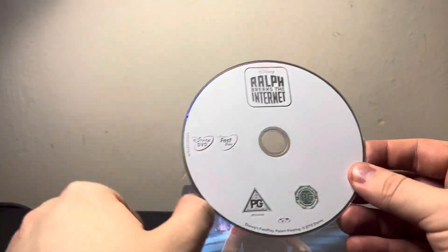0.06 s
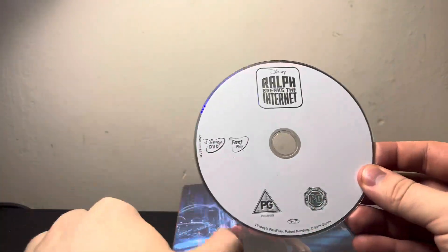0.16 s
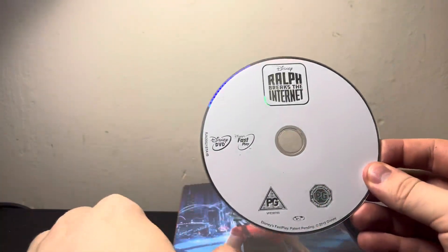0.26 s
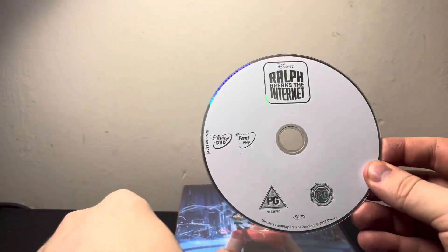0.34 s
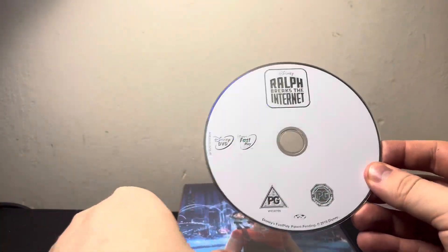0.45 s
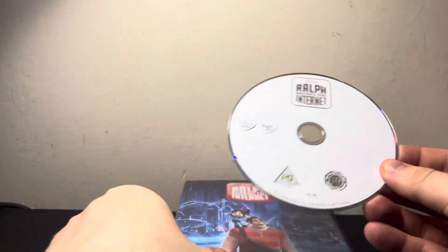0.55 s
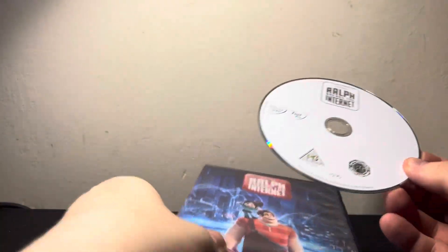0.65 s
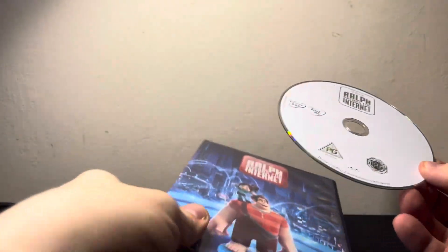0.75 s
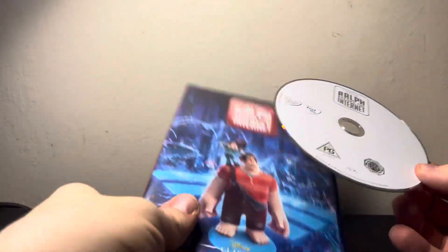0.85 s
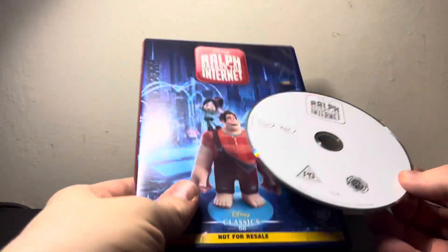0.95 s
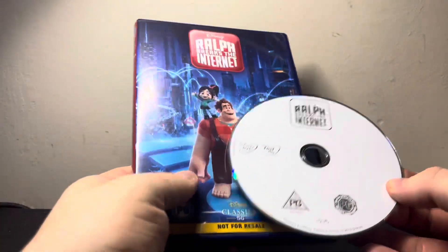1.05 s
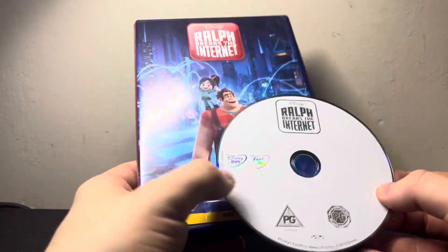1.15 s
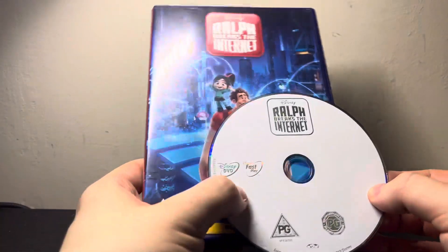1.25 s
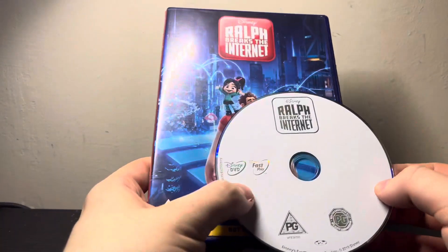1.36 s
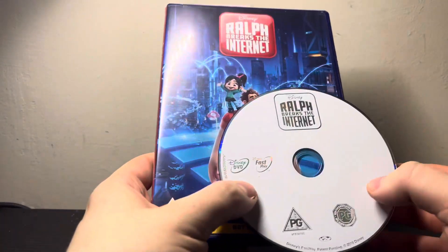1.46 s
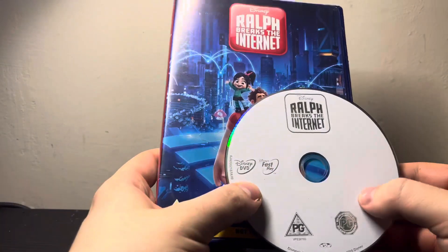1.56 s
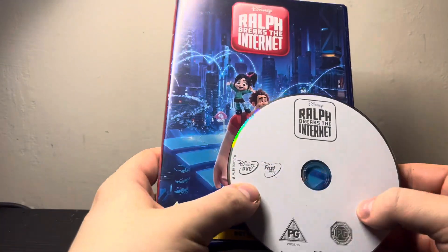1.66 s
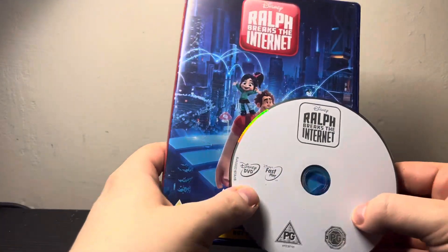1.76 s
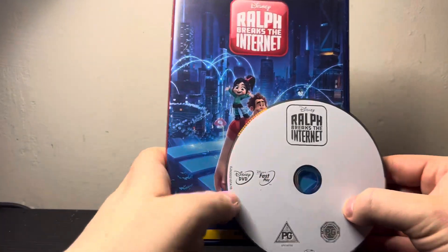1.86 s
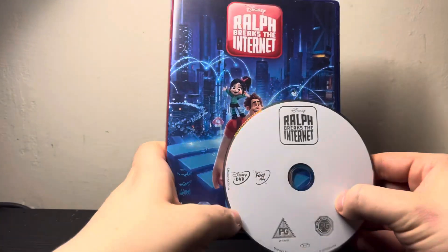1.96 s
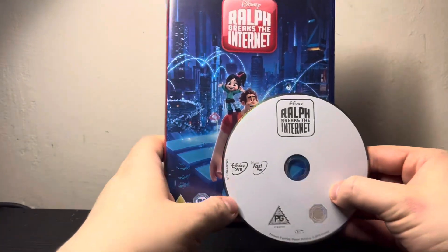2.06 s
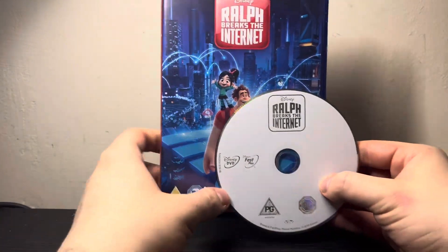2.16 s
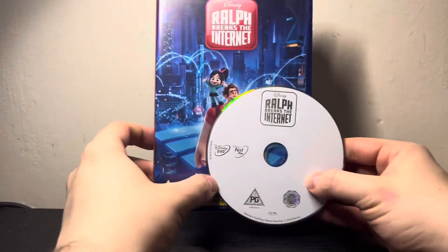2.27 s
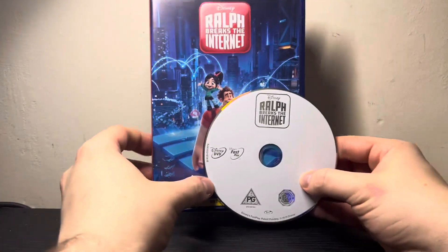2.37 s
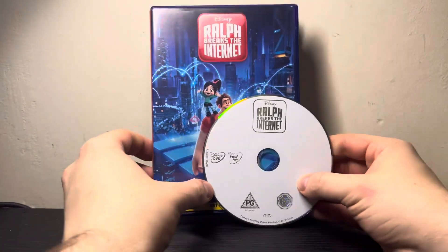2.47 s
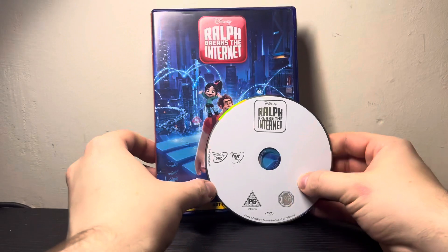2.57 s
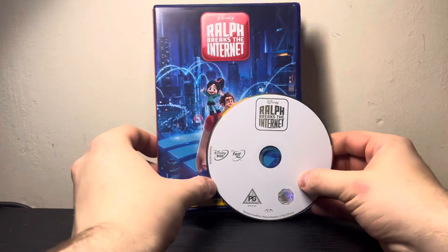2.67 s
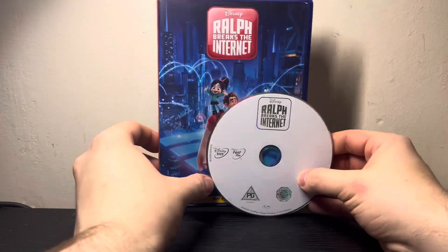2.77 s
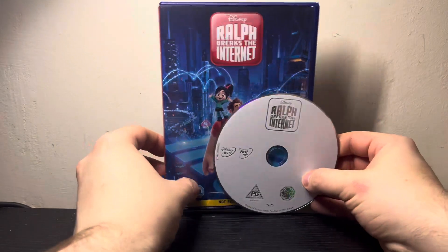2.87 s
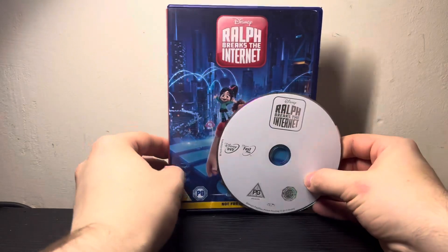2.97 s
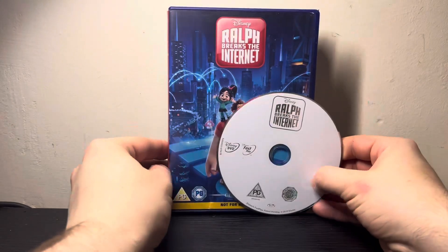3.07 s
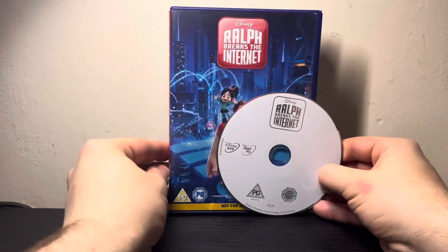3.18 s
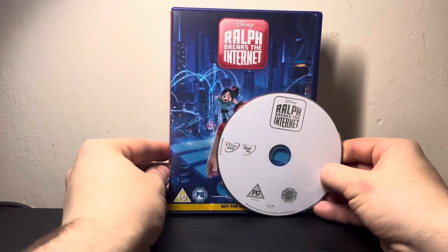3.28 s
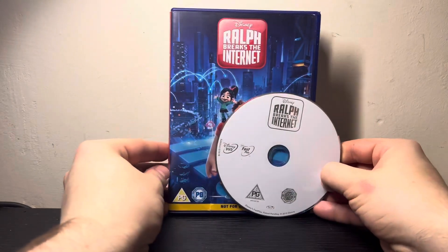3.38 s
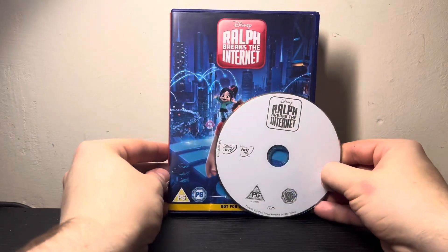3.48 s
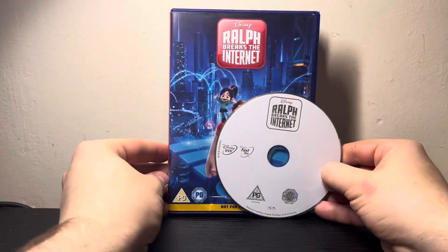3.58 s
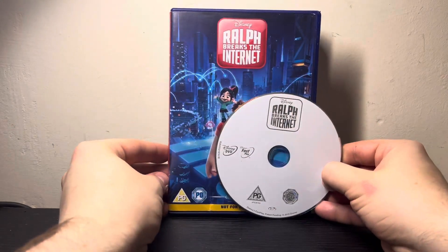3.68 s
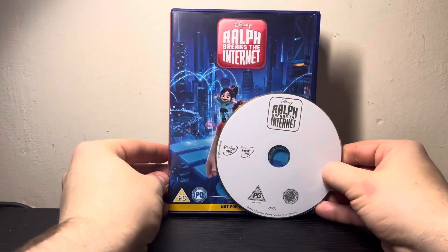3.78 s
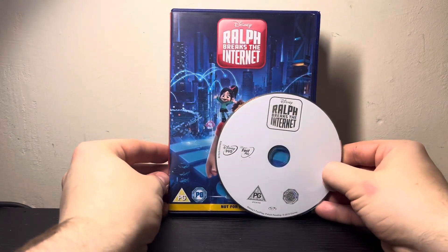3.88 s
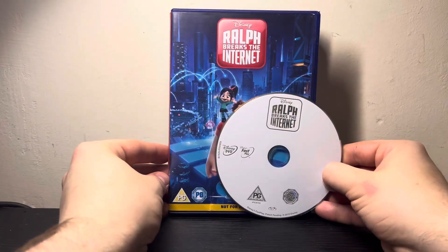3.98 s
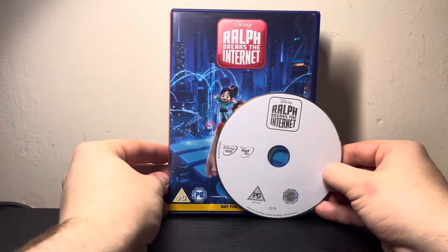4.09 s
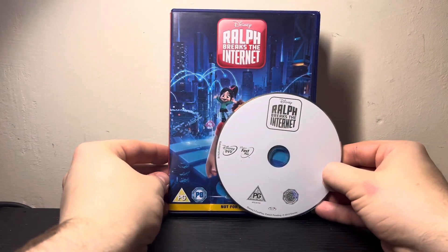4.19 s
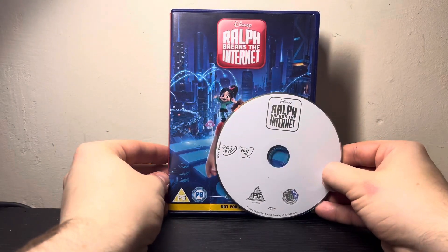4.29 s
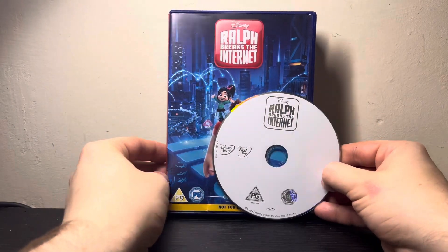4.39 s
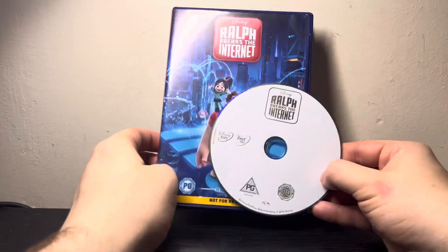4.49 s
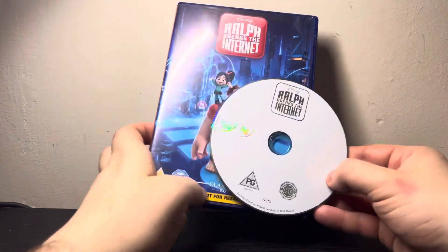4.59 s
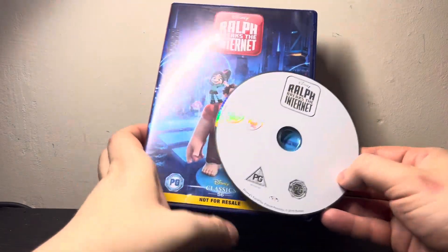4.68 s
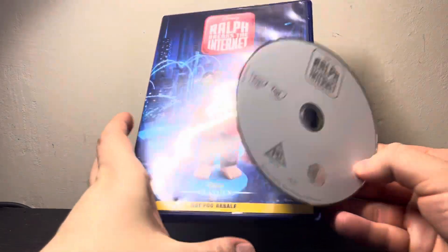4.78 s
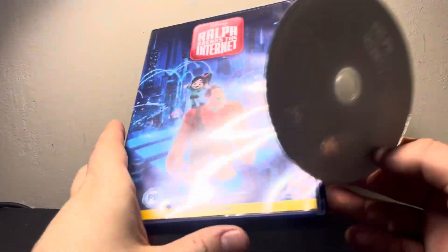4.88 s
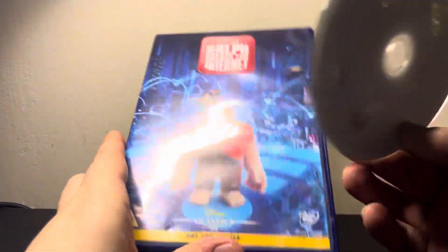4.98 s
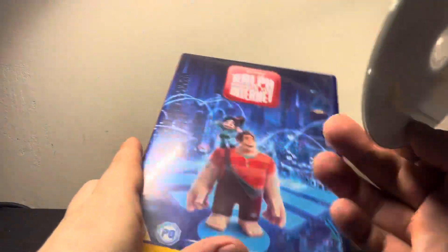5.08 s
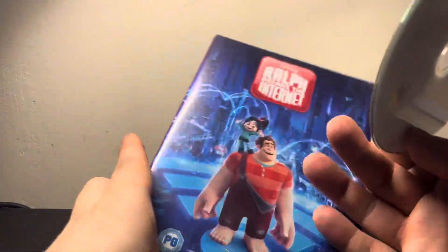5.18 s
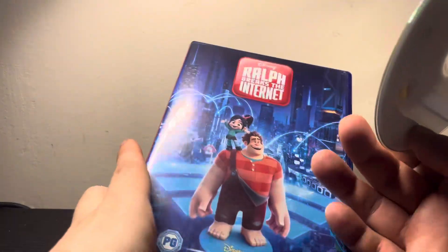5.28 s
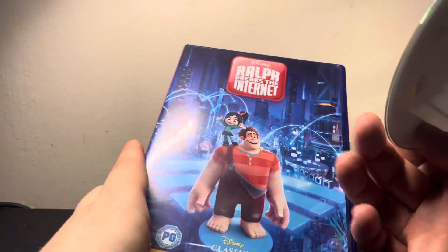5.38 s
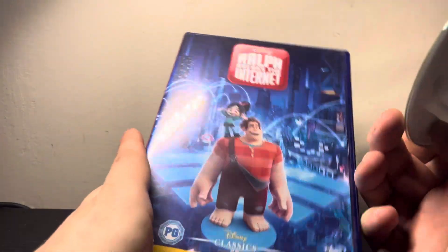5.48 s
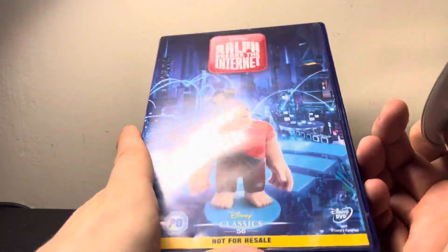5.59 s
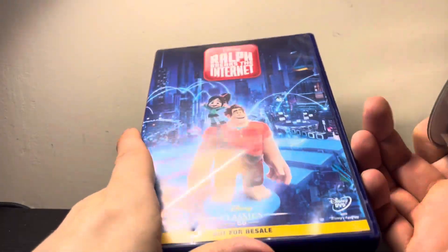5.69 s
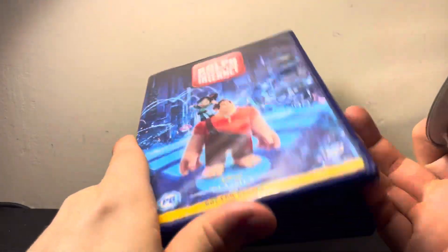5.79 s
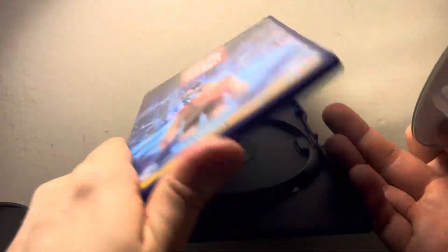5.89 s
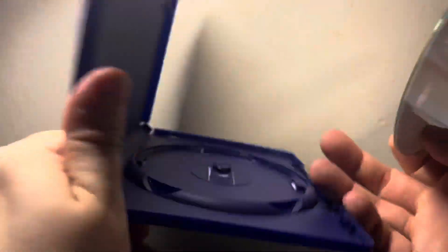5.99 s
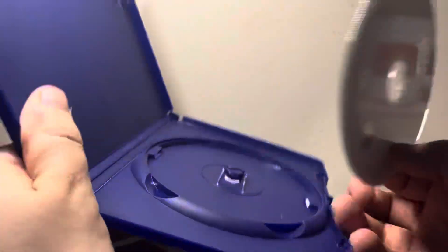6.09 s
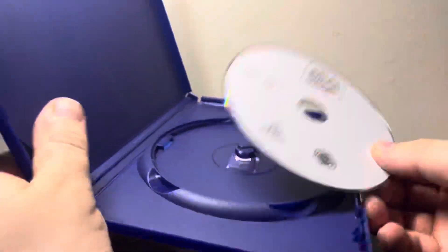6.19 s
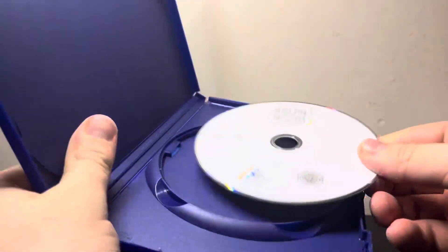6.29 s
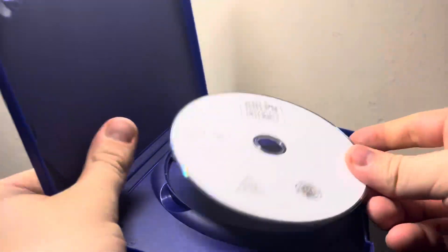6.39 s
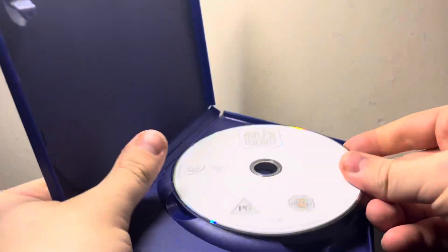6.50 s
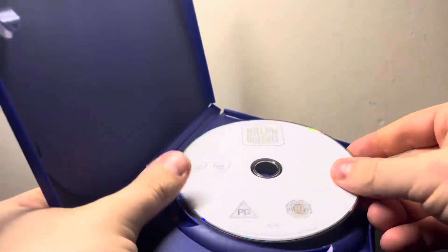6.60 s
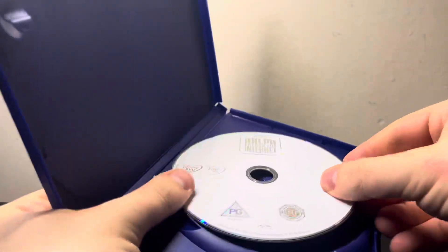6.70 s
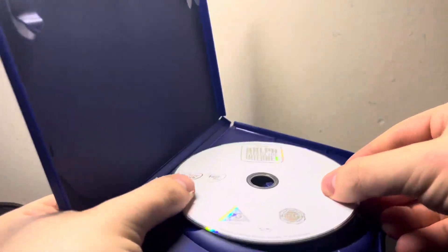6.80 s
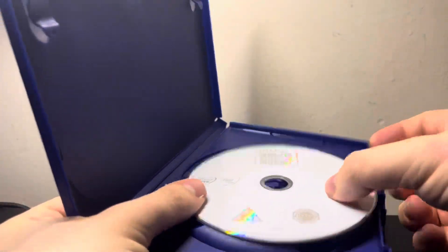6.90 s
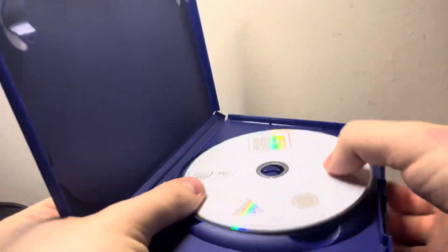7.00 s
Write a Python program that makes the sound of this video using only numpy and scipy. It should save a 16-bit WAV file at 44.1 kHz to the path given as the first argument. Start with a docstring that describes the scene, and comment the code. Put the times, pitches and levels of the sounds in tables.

```python
"""Disc and plastic case on a table

Hands handle a disc and its plastic case close to the microphones in a small room, with a faint fan.
The case scrapes as it is tipped up, its edge judders over the table, and skin slides over the sleeve.
It snaps open, the lid falls back, and the disc is laid in and clicked onto the hub.
Rubs are noise grains or stick-slip pulses through resonances; contacts are noise bursts with decaying rings."""
import sys
import numpy as np
from scipy import signal
from scipy.fft import rfft, irfft, next_fast_len
from scipy.io import wavfile
from scipy.ndimage import uniform_filter1d, map_coordinates

SR = 44100
rng = np.random.default_rng(int(sys.argv[2]) if len(sys.argv) > 2 else 0)


def to_wav(sig):
    """Store sig (one row per channel, or 1-D mono) as 16-bit WAV at the path in sys.argv[1].

    Samples outside -1..1 are clipped; the rate is SR.
    """
    pcm = np.clip(np.atleast_2d(sig), -1, 1) * 32767
    pcm = np.round(pcm).astype(np.int16)
    wavfile.write(sys.argv[1], SR, pcm.T)  # frames by channels


N = 310905
TIME = np.arange(N) / SR

# Resonances of the case. Each row: frequency in Hz, width in Hz, relative level in dB.
CASE_RESONANCES = [(952, 39, 4.5), (1283, 48, 8), (1670, 42, 0), (2083, 36, 1.5), (2351, 25, 1),
                   (3583, 140, 4.5), (4134, 120, -21), (5740, 160, -4)]
# Low resonances of the case pressed on the table. Each row: frequency in Hz, width in Hz, relative level in dB.
GROAN_RESONANCES = [(109, 77, -5.5), (233.7, 29, -2), (440, 64.6, 1.5), (520.5, 29, 2)]
# Middle resonances of the case on the table. Each row: frequency in Hz, width in Hz, relative level in dB.
JUDDER_RESONANCES = [(825, 70, -4), (909, 38, -1), (950, 63, -6.5)]
# Spectrum of a plastic scrape. Each row: frequency in Hz, relative level in dB.
SCRAPE_SPECTRUM = [(82, -44.5), (140, -21), (540, -11.5), (880, -9.5), (1410, -12), (2430, -12),
                   (3600, -14.5), (5300, -16), (8020, -34.5), (12300, -33), (14800, -52.5)]
# Registers of a contact: clack, hollow body, snap, tick. Each row: low edge in Hz, high edge in Hz.
CONTACT_REGISTERS = [(600, 2000), (230, 600), (2000, 6000), (6000, 15000)]


def from_db(db):
    """Decibels to gain."""
    return 10 ** (np.asarray(db) / 20)


def rms_one(x):
    """Scale to rms 1."""
    return x / np.sqrt(np.mean(x ** 2) + 1e-20)


def evened(x, span_s=0.074):
    """Hold the level steady over a short span, keeping quicker pulses."""
    power = uniform_filter1d(np.mean(x ** 2, axis=0), max(8, int(span_s * SR)))
    return x / np.sqrt(power + 1e-12)


def dying(t, t60):
    """Exponential decay, 60 dB down after t60 seconds."""
    return np.exp(-np.log(1000) * t / np.maximum(t60, 1e-3))


def at_hz(points, hz):
    """Read a (Hz, value) table on a log-frequency axis."""
    known_hz, values = np.transpose(points)
    return np.interp(np.log(np.maximum(hz, 1)), np.log(known_hz), values)


def stroke_gain(curve):
    """Gain over time from an (s, dB) curve, slightly smoothed; silent outside it."""
    s, db = np.transpose(curve)
    gain = from_db(np.interp(TIME, s, db, -200, -200))
    return uniform_filter1d(gain, SR // 300).clip(0)


def swell(top_s, half_s, shape=2.34):
    """Pressure of a short stroke: rises to its top and lets go, at 1/e after half_s."""
    gain = np.zeros(N)
    near = np.abs(TIME - top_s) < 6 * half_s
    gain[near] = np.exp(-np.abs((TIME[near] - top_s) / half_s) ** shape)
    return gain


def add(track, s, sound):
    """Mix a stereo sound into the track at time s."""
    start = max(0, round(s * SR))
    track[:, start:start + sound.shape[1]] += sound[:, :N - start]


def band(x, low, high, order=3):
    """Causal band-pass."""
    sos = signal.butter(order, [low, min(high, .45 * SR)], "band", fs=SR, output="sos")
    return signal.sosfilt(sos, x + 1e-18)


def coloured(x, spectrum):
    """Filter with a smooth (Hz, dB) spectrum."""
    count = x.shape[-1]
    size = next_fast_len(count + 2048)
    gain = from_db(at_hz(spectrum, np.fft.rfftfreq(size, 1 / SR)))
    return irfft(rfft(x, size) * gain, size)[..., :count]


def resonate(x, modes):
    """Parallel resonances of (Hz, width in Hz, dB), signs alternating."""
    total = 0
    for k, (hz, width, db) in enumerate(modes):
        ring = signal.lfilter(*signal.iirpeak(hz, hz / width, SR), x + 1e-18)
        total = total + (-1) ** k * from_db(db) * ring
    return total


def drift(rate):
    """Smooth random curve about 0 through normal draws, rate per second (at most 500)."""
    knots = rng.standard_normal(4000)
    coarse = TIME[::16]
    return np.interp(TIME, coarse, map_coordinates(knots, [coarse * min(rate, 500)], order=2))


def two_mics(count):
    """Noise at two microphones: alike in the bass and top treble, largely unrelated between."""
    # Likeness of the two channels. Each row: frequency in Hz, correlation from -1 to 1.
    likeness = [(100, 0.94), (300, 0.44), (650, -0.24), (1500, -0.014), (7000, -0.17), (13000, 0.8)]
    mid, side = rng.standard_normal((2, count))
    alike = [(hz, np.clip(value, -.99, .99)) for hz, value in likeness]
    mid = coloured(mid, [(hz, 10 * np.log10((1 + value) / 2)) for hz, value in alike])
    side = coloured(side, [(hz, 10 * np.log10((1 - value) / 2)) for hz, value in alike])
    return np.array([mid + side, mid - side])


def from_right(x, lag_ms):
    """A source that reaches the right microphone first."""
    at = np.arange(len(x))
    left = np.interp(at - lag_ms * SR / 1000, at, x, left=0)
    return np.array([left, x])


def radiate(x, t60, wander_per_s=5, count=3, ripple=0.5):
    """Dense shell modes smear a rub per microphone; their ripple shifts as the contact moves."""
    t, out = np.arange(SR // 12) / SR, 0
    weights = np.array([drift(wander_per_s) for spot in range(count)])
    for weight in weights / np.sqrt(np.sum(weights ** 2, axis=0) + 0.16):
        response = rfft(two_mics(len(t)) * dying(t, t60))
        rippled = response * np.abs(response) ** (ripple - 1)  # shallower peaks and dips, same phase
        smear = np.roll(irfft(rippled), len(t) // 2, axis=1)
        out = out + signal.oaconvolve((x * weight)[None], smear, axes=1)[:, :N]
    return out


def grains(per_s, spread_db):
    """Tiny catches of a rough surface, at random times and of random sizes."""
    sizes = from_db(spread_db * np.minimum(rng.exponential(1, N), 4)) * rng.choice([-1, 1], N)
    return rms_one(sizes * (rng.random(N) < per_s / SR))


def slips(per_s, uneven, grit_db, spread_db=4):
    """Stick and slip: a nearly regular train of releases with noise grit added."""
    turns = np.cumsum(per_s * np.exp(uneven * drift(25))) / SR
    sizes = from_db(spread_db * rng.standard_normal(N).clip(-2, 1.5))
    releases = np.diff(np.floor(turns), prepend=0) * sizes
    return rms_one(releases) + from_db(grit_db) * rng.standard_normal(N)


def background(level_db=-55):
    """The soft rush of a fan: steady noise with a few broad resonances."""
    # Fan spectrum. Each row: frequency in Hz, relative level in dB.
    fan_spectrum = [(24, -9.5), (48, 0.5), (90, 0), (181, -14), (264, -17), (394, -12), (540, -19),
                    (621, -10.5), (680, -19.5), (1310, -22), (1900, -25.5), (2650, -39.5), (5000, -43.5),
                    (15000, -56)]
    return from_db(level_db) * rms_one(coloured(two_mics(N), fan_spectrum))


def room(x, wet_db=-11, build_s=0.0009):
    """Reflections from the near wall thicken into a short tail of band-wise decaying noise."""
    # Reverberation. Each row: frequency in Hz, 60 dB decay time in s.
    decay_times = [(100, 0.066), (500, 0.23), (3000, 0.19), (12000, 0.173)]
    t, edges_hz = np.arange(SR // 2) / SR, np.geomspace(60, 16000, 9)
    noise = rng.standard_normal((2, len(t)))
    tail = 0
    for low, high in zip(edges_hz, edges_hz[1:]):
        tail = tail + band(noise, low, high) * dying(t, at_hz(decay_times, np.sqrt(low * high)))
    tail = tail * (1 - np.exp(-(t / build_s) ** 2))
    response = rms_one(tail) / np.sqrt(len(t))
    return from_db(wet_db) * signal.fftconvolve(x, response, axes=1)[:, :N]


def bumps(level_db=1, swell_s=0.0057, table_t60=0.47, table_db=-13, skew_rad=0.28):
    """A soft push of case or hand swings the table top for a few cycles."""
    # Each row: start in seconds, level in dB before level_db, pitch in Hz.
    pushes = [(0.362, -44, 72), (1.085, -37, 68), (1.183, -46, 148), (2.499, -42, 148.5),
              (3.212, -35, 49.2), (3.232, -27.5, 77.5), (4.186, -43, 72.7), (4.516, -34, 128.5),
              (5.177, -33.5, 78), (5.238, -36.5, 92.3), (6.15, -40, 89.4), (6.221, -29, 89),
              (6.474, -34, 117.3), (6.928, -32, 101)]
    out, t = np.zeros((2, N)), np.arange(SR // 3) / SR
    swing = t / swell_s * np.exp(1 - t / swell_s) + from_db(table_db) * dying(t, table_t60)
    swing = swing * (1 - np.exp(-(2 * t / swell_s) ** 2))
    for s, db, hz in pushes:
        phases = rng.normal(0, skew_rad, (2, 1))
        add(out, s, from_db(db + level_db) * swing * np.sin(2 * np.pi * hz * t + phases))
    return out


def glide(s, length_s, attack_s=0.035, release_s=0.034, sag_db_per_s=8.5):
    """Gain of a slide: sets in quickly, sags a little as it slows and dies away."""
    t = TIME - s
    outside = np.maximum(-t, 0) / attack_s + np.maximum(t - length_s, 0) / release_s
    return from_db(-sag_db_per_s * t) * np.exp(-outside)


def skin(level_db=12, flutter_db=1.43, shell_db=2):
    """Fingers glide over sleeve and disc: a fine hiss, partly through the shell, with varying sheen."""
    # Each row: start in seconds, length in seconds, level in dB before level_db, top-octave change in dB.
    slides = [(0.356, 0.48, -78, 0), (0.964, 0.4, -72.5, -1), (1.721, 0.57, -65.5, 1),
              (2.328, 0.5, -70.5, -2), (2.957, 0.077, -84.5, 12.5), (4.647, 0.25, -62, 0),
              (4.95, 0.16, -66, -3), (5.216, 0.2, -77, -5.5), (5.952, 0.18, -71, 4), (6.19, 0.064, -59, 0),
              (6.291, 0.13, -76, 0)]
    # Each row: frequency in Hz, relative level in dB.
    skin_spectrum = [(410, -5.5), (700, -1.5), (1780, -7), (4580, -5.5), (7500, -11), (11100, -13),
                     (13200, -14.5), (14600, -36.5)]
    through_shell = rms_one(radiate(grains(per_s=15000, spread_db=0.5), t60=0.011, wander_per_s=12))
    rub = rms_one(two_mics(N)) + from_db(shell_db) * through_shell
    hiss = rms_one(coloured(rub, skin_spectrum))
    sheen = coloured(hiss, [(5000, -40), (9000, 0)])
    out = 0
    for s, length_s, db, sheen_db in slides:
        out = out + from_db(db) * glide(s, length_s) * (hiss + (from_db(sheen_db) - 1) * sheen)
    return from_db(level_db + flutter_db * drift(49)) * out


def squeak(rough=0.19, overtone_db=-11, lag_ms=0.88):
    """The lid's lip catches under the thumb: each catch is a few rough cycles of stick and slip."""
    # Each row: time of the top in seconds, half length in seconds, pitch in Hz, level in dB.
    catches = [(5.199, 0.003, 1129, -35), (5.214, 0.0042, 1120, -31), (5.219, 0.0052, 1250, -36)]
    out, wander = 0, np.exp(rough * drift(400))
    for s, half_s, hz, db in catches:
        phase = 2 * np.pi * np.cumsum(hz * wander) / SR
        overtones = np.sin(2 * phase) + np.sin(3 * phase) / 2
        wave = np.sin(phase) + from_db(overtone_db) * overtones
        out = out + from_db(db) * swell(s, half_s, shape=0.97) * wave
    flutter = from_db(4 * drift(230))
    return from_right(out * np.sqrt(2) * flutter, lag_ms)


def scrapes(register_dbs=(-4, 1.5, -2), bright_shares=(0, 0.28, 1), ring_db=-2,
            sing_db=12, sing_width_hz=90, chatter_db=1.5):
    """Short strokes of plastic on plastic, and a light finger swish at 1.26 s: dense catches ring in the case
    and one pitch sings out."""
    # Each row: time of the top in seconds, pressure in dB, brightness in dB, half length in seconds,
    # singing pitch in Hz.
    strokes = [(0.367, -50.5, -37, 0.041, 1320), (1.169, -45.5, -15, 0.019, 1880),
               (1.26, -62, 14.5, 0.024, 5150), (4.73, -47, -26, 0.012, 910),
               (4.872, -44.5, -33, 0.028, 2300), (4.914, -40, -9, 0.021, 3010),
               (5.548, -53, -10.5, 0.037, 1150), (6.125, -42, -1, 0.021, 5060),
               (6.187, -44, -2, 0.0072, 4040), (6.336, -41.5, -6.5, 0.0045, 3870),
               (6.348, -50, -5.5, 0.024, 4210), (6.642, -45, -14, 0.056, 3720),
               (6.935, -36.5, -13, 0.029, 2400), (7.008, -41.5, -15.5, 0.015, 2130)]
    # Registers: body, edge, sheen. Each row: low edge in Hz, high edge in Hz.
    scrape_registers = [(130, 2800), (2800, 7500), (7500, 15000)]
    chatter = from_db(chatter_db * drift(200))
    catches = radiate(grains(per_s=2200, spread_db=-0.5) * chatter, t60=0.011, wander_per_s=9)
    rub = coloured(catches + from_db(ring_db) * resonate(catches, CASE_RESONANCES), SCRAPE_SPECTRUM)
    out = np.zeros((2, N))
    for s, db, bright_db, half_s, hz in strokes:
        near = slice(max(0, int((s - .25) * SR)), int((s + .25) * SR))
        stroke = rub[:, near] + resonate(rub[:, near], [(hz, sing_width_hz, sing_db)])
        pressure = swell(s, half_s)[near]
        for (low, high), register_db, share in zip(scrape_registers, register_dbs, bright_shares):
            part = evened(band(stroke, low, high), span_s=0.026)
            out[:, near] += from_db(db + register_db + share * bright_db) * pressure * part
    return out


def jerks(level_db=-2, t60=0.19, top_hz=850, lag_ms=0.36):
    """A big slip of the case edge lets go all at once and knocks on the dragging resonances."""
    # Each row: start in seconds (1.5 ms is added), level in dB before level_db.
    big_slips = [(2.5, -27.5), (2.779, -31.5), (2.803, -24.5)]
    out, t = np.zeros((2, N)), np.arange(SR // 8) / SR
    knock = resonate(signal.unit_impulse(len(t)), GROAN_RESONANCES + JUDDER_RESONANCES)
    knock = band(knock, 178, top_hz) * dying(t, t60)
    knock = from_right(knock / knock[:SR // 150].std(), lag_ms)
    for s, db in big_slips:
        add(out, s + 0.0015, from_db(db + level_db) * knock)
    return out


def drag(groan_db=-41.5, groan_knee_db=-70, judder_db=11, judder_power=1.002, judder_rise=1.06,
         rasp_db=10, rasp_power=1.252, flutter_db=3, lag_ms=0.22):
    """The case edge stutters over the table: light force groans, more adds judder, then a thin rasp."""
    # The case is pushed back in one go. Each row: time in seconds, force in dB.
    push_curve = [(2.49, -100), (2.51, -51), (2.732, -40.5), (2.776, -51.5), (2.81, -46), (2.816, -61),
                  (2.85, -76)]
    # Then it is nudged into place. Each row: time of the top in seconds, force in dB, half length in seconds.
    nudges = [(2.871, -64, 0.012), (2.91, -59.5, 0.0092), (3.025, -67.5, 0.016), (3.059, -70, 0.03),
              (3.149, -80.5, 0.041), (3.297, -65.5, 0.022), (3.37, -72.5, 0.028), (3.45, -73, 0.034),
              (3.592, -81, 0.034), (4.339, -78, 0.038), (4.443, -78, 0.016)]
    # Higher resonances of the case. Each row: frequency in Hz, width in Hz, relative level in dB.
    rasp_resonances = [(1306, 44, 8.5), (1560, 70, 6.5), (1938, 110, 7), (2290, 150, 0), (2810, 114, 5),
                       (4230, 3300, -12)]
    nudging = sum(from_db(db) * swell(s, half_s) for s, db, half_s in nudges)
    force = stroke_gain(push_curve) + from_db(flutter_db * drift(60)) * nudging
    shell = radiate(slips(per_s=69.8, uneven=0.035, grit_db=-1), t60=0.05, wander_per_s=3)

    groan = band(resonate(shell[0], GROAN_RESONANCES), 89, 640)
    groan = evened(from_right(groan, lag_ms), span_s=0.018)

    # a lightly pressed edge judders higher by judder_rise
    pressed = force / force.max()
    firm = resonate(shell[0], JUDDER_RESONANCES)
    light = resonate(shell[0], [(hz * judder_rise, width, db) for hz, width, db in JUDDER_RESONANCES])
    judder = band(pressed * firm + (1 - pressed) * light, 535, 1135)
    judder = evened(from_right(judder, lag_ms), span_s=0.036)

    rasp = evened(band(resonate(shell, rasp_resonances), 490, 12000), span_s=0.24)
    return (from_db(groan_db) * groan * force / (force + from_db(groan_knee_db))
            + from_db(judder_db) * judder * force ** judder_power
            + from_db(rasp_db) * rasp * force ** rasp_power)


def tipping(level_db=0, face_grit_db=-7, rim_grit_db=-8, chatter_db=2.0, top_hz=7000):
    """The case grates in dense catches as it tips up; contact shifts between dull face and shrill rim."""
    # Each row: time in seconds, pressure in dB, share of the contact on the rim from 0 to 1.
    tip_curve = [(0.46, -78, 0.3), (0.501, -50, 0.62), (0.52, -58.5, 0.7), (0.558, -65.5, 0.3),
                 (0.567, -49.5, 0.7), (0.602, -37.5, 0.07), (0.629, -34.5, 0), (0.657, -39, 0),
                 (0.674, -33, 0.93), (0.693, -34, 1), (0.698, -28, 1), (0.721, -28, 1), (0.742, -46, 0.6),
                 (0.774, -42.5, 0), (0.79, -64, 0.3), (0.82, -91, 0.5)]
    # Each row of both: frequency in Hz, width in Hz, relative level in dB.
    face_resonances = [(188, 210, -13.5), (690, 41, -6.5), (1018, 60, -9), (1390, 80, 4.5), (1800, 89, 0.5),
                       (2822, 89, 0.5), (3454, 114, -8.5)]
    rim_resonances = [(861, 76, -9), (1510, 90, -9.5), (2190, 150, -0.5), (2887, 110, 1.5),
                      (3703, 140, 2.5), (4630, 428, -12), (5524, 30, -2.5)]
    chatter = from_db(chatter_db * drift(200))
    catches = radiate(grains(per_s=2800, spread_db=0.5) * chatter, t60=0.017, wander_per_s=14.36)
    grit = rms_one(coloured(catches, SCRAPE_SPECTRUM))

    def grate(modes, grit_db):
        """Catches ringing in one part of the case, with grit."""
        ring = rms_one(band(resonate(catches, modes), 87, top_hz))
        return evened(ring + from_db(grit_db) * grit, span_s=0.017)

    face, rim = grate(face_resonances, face_grit_db), grate(rim_resonances, rim_grit_db)
    s, db, share = np.transpose(tip_curve)
    on_rim = np.interp(TIME, s, share).clip(0, 1)
    pressure = from_db(level_db) * stroke_gain(list(zip(s, db)))
    return pressure * (np.sqrt(1 - on_rim) * face + np.sqrt(on_rim) * rim)


def registers(hard_db, reach_per_hardness=0.82):
    """Bands of one contact: the snap's bandwidth shrinks, in dB per dB of softness."""
    clack, hollow, (low, high), tick = CONTACT_REGISTERS
    snap_top = low + (high - low) * from_db(reach_per_hardness * min(hard_db, 0))
    return clack, hollow, (low, snap_top), tick


def contacts(modes_db=5, main_db=-6, main_t60=0.027, main_ring_per_softness=0.9, crack_db=7, crack_t60=0.0078,
             tail_db=-2, tail_t60=0.09, treble_damping=0.37, tick_db=-9.5, tick_per_hardness=1.65,
             spot_db=3, delay_s=0.00054):
    """Each contact is a crack and a blur of dense plastic modes, in which the case's own rings stand out."""
    # Each row: start in seconds (delay_s is added), strength in dB, hardness in dB (snap against clack),
    # hollowness in dB (more on the table), main ring in Hz, give in ms.
    hits = [(0.345, -45, -10, 0.5, 507, 0.35), (0.525, -49.5, -10.5, 2, 1350, 0.56),
            (0.6959, -41, 0.5, -22, 2250, 1.4), (0.775, -43, -5.5, -14, 1144, 0.42),
            (0.979, -41, -1.5, 0, 1290, 0.6), (1.074, -43, -4, -3.5, 593, 4.2),
            (1.183, -36, 0, -8, 1320, 0.78), (1.229, -41.5, -1, -7.5, 2034, 0.52),
            (1.722, -58, -5, 6.5, 675, 0.61), (1.988, -51.5, -5, -11, 810, 1.0),
            (2.466, -50.5, -5.5, -1, 800, 0.82), (2.803, -42.5, -5.5, 0.5, 856, 0.76),
            (4.51, -29.5, -4, -9, 1284, 0.38), (4.5155, -28, -23, -8, 833, 1.3),
            (4.539, -42, -5, 0.5, 990, 2), (4.586, -47.5, -14, -14, 858, 1.9),
            (5.018, -45, -5, -16, 2110, 0.21), (5.15, -56, 3.5, -3, 970, 2.8),
            (5.167, -40.5, -6, -2, 927, 4.2), (5.75, -31.5, -6, -15, 1140, 1.56),
            (5.7588, -42, -4.5, -7, 2260, 2.2), (6.2133, -33, 1.5, -5.5, 1160, 0.97),
            (6.22, -39, -7.5, 0, 690, 0.92), (6.469, -32, 1.5, -4, 1030, 1.4),
            (6.48, -40.5, -1, -0.5, 1170, 0.9), (6.507, -33.5, -2.5, -10.5, 934, 2.1),
            (6.584, -36.5, 3, -12, 2070, 0.77), (6.593, -37.5, -2, -1, 994, 1.3),
            (6.732, -61, 1.5, 2, 690, 0.67), (6.903, -39.5, 5, -10, 2246, 2.8),
            (6.913, -43.5, -3, -6, 1620, 3.8), (6.922, -31.5, 5, -11, 2270, 1.1),
            (6.931, -34, -8.5, -4.5, 940, 1), (6.949, -39, -2, -3.5, 692, 2.9)]
    out, t = np.zeros((2, N)), np.arange(SR // 6) / SR
    for s, strength_db, hard_db, hollow_db, main_hz, give_ms in hits:
        blur = two_mics(len(t))
        crack = from_db(crack_db) * blur * dying(t, crack_t60)
        # grip and struck spot weight the modes anew
        modes = [(hz, width, db + spot_db * rng.standard_normal()) for hz, width, db in CASE_RESONANCES]
        ring = from_db(modes_db) * resonate(crack, modes)
        # a soft contact leaves more in the main ring
        phases = rng.uniform(0, 2 * np.pi) + rng.normal(0, 0.42, (2, 1))
        main = np.sin(2 * np.pi * main_hz * t + phases) * dying(t, main_t60)
        ring += from_db(main_db - main_ring_per_softness * hard_db) * main
        onset = 1 - np.exp(-(1000 * t / give_ms) ** 2)
        register_dbs = (0, hollow_db, hard_db, tick_db + tick_per_hardness * hard_db)
        for (low, high), db in zip(registers(hard_db), register_dbs):
            t60 = tail_t60 * (CONTACT_REGISTERS[0][0] / low) ** treble_damping
            tail = from_db(tail_db) * blur * dying(t, t60)
            part = band((crack + ring + tail) * onset, low, high)
            add(out, s + delay_s, from_db(strength_db + db) * part / part[:, :SR // 100].std())
    return out


def scene():
    """Handling close by with wall reflections, table bumps and fan; the left is louder, most near 4.5 kHz."""
    # Left minus right. Each row: frequency in Hz, level difference in dB.
    lean = [(100, 2), (500, 2.5), (1000, 3.5), (2000, 2.5), (4500, 9), (8000, 1.5), (14000, -1.5)]
    handling = contacts() + drag() + jerks() + tipping() + scrapes() + squeak() + skin()
    left, right = handling + room(handling) + bumps() + background()
    left = coloured(left, [(hz, db / 2) for hz, db in lean])
    right = coloured(right, [(hz, -db / 2) for hz, db in lean])
    return np.array([left, right])


def record(dry, dip_hz=7900, dip_width_hz=2200, dip_share=0.67, top_hz=13200, rumble_hz=38, cutoff_hz=15800):
    """The microphone drops deepest bass, dips in the treble and has a soft top; the highest band is cut."""
    peak = signal.lfilter(*signal.iirpeak(dip_hz, dip_hz / dip_width_hz, SR), dry)
    heard = dry - np.clip(dip_share, 0, 1) * peak
    heard = signal.sosfilt(signal.butter(5, [rumble_hz, top_hz], "band", fs=SR, output="sos"), heard)
    return signal.sosfilt(signal.ellip(10, .1, 80, cutoff_hz, fs=SR, output="sos"), heard)


dry = scene()
out = record(dry)
to_wav(out)
```